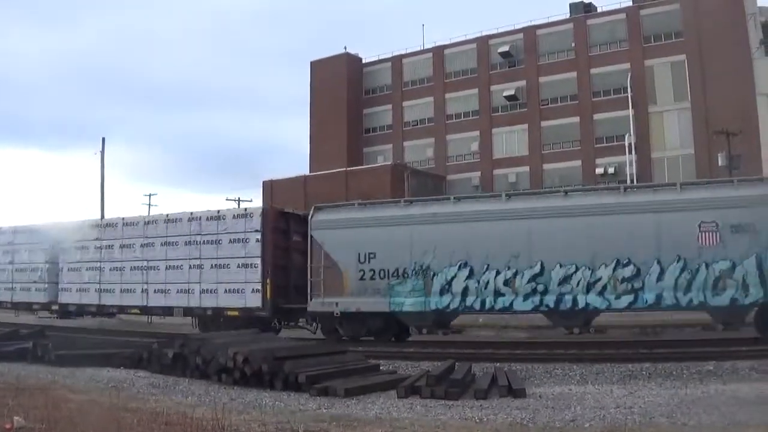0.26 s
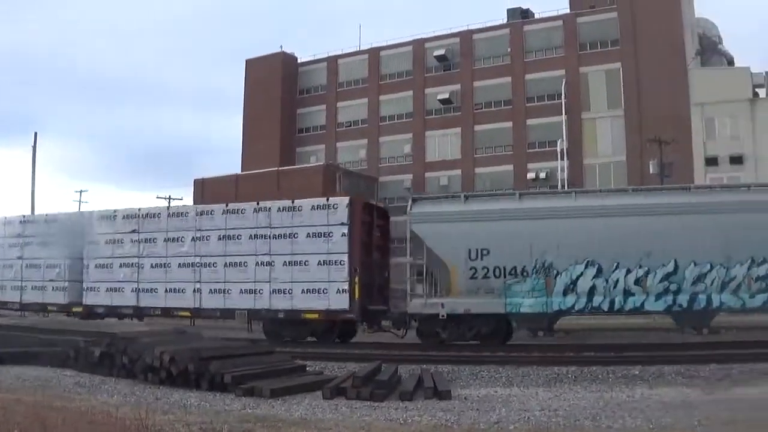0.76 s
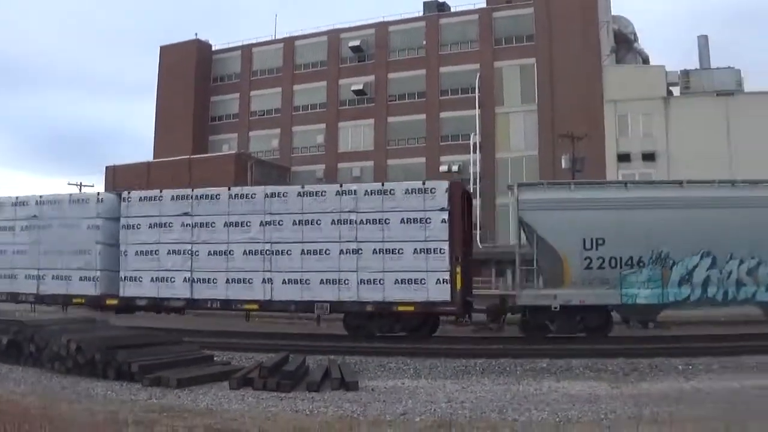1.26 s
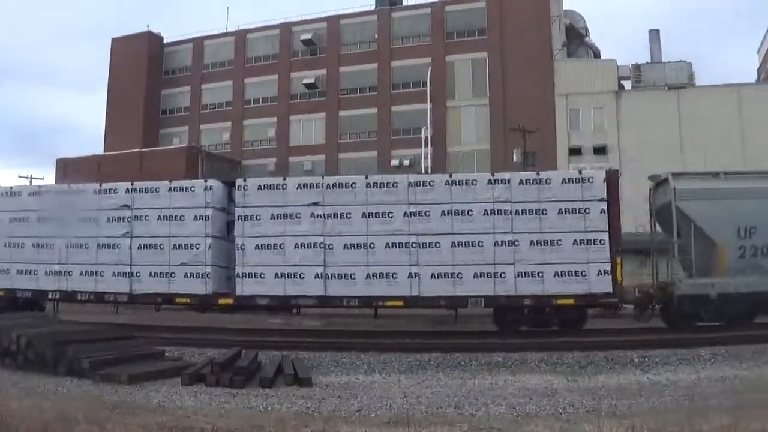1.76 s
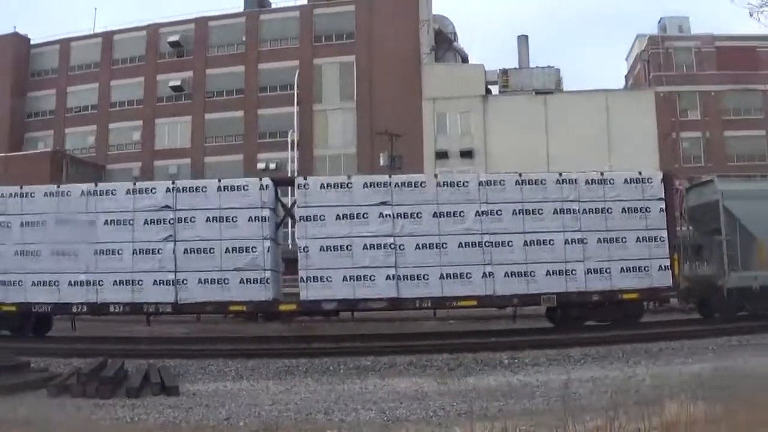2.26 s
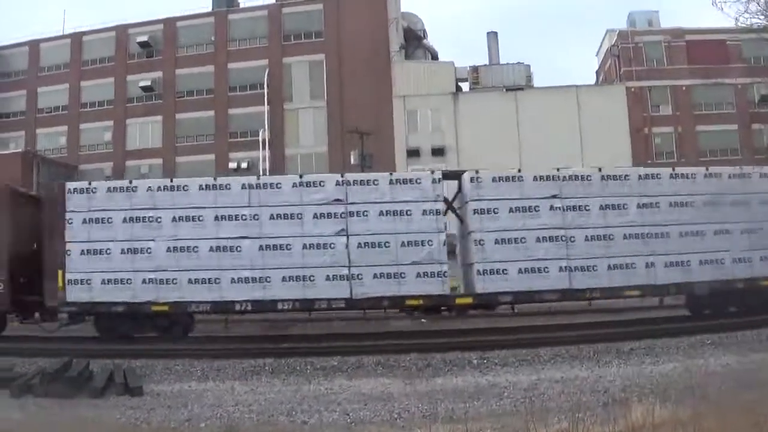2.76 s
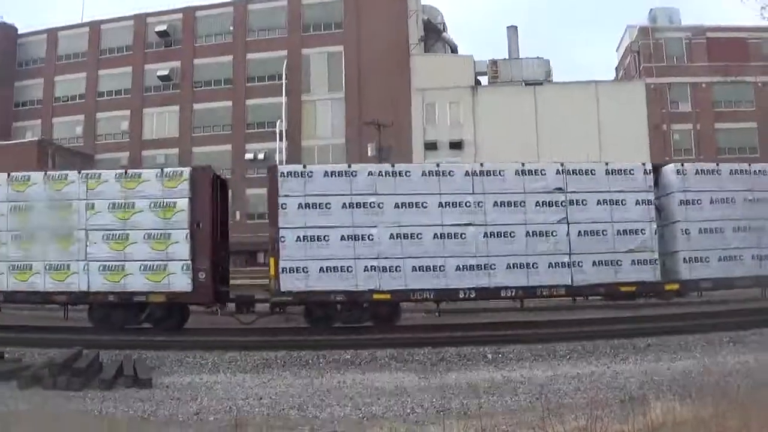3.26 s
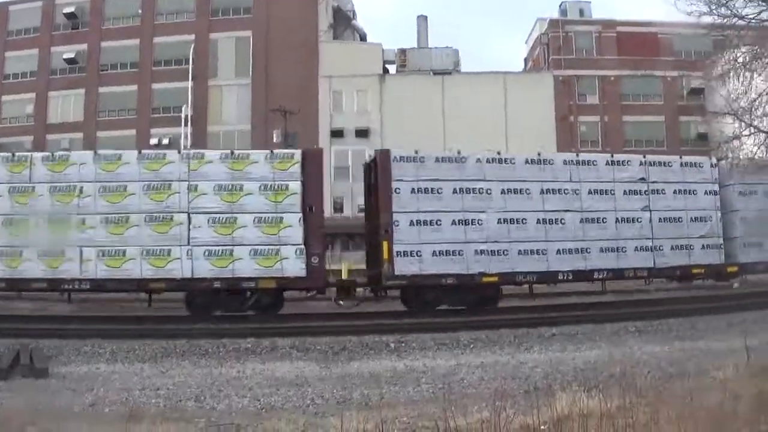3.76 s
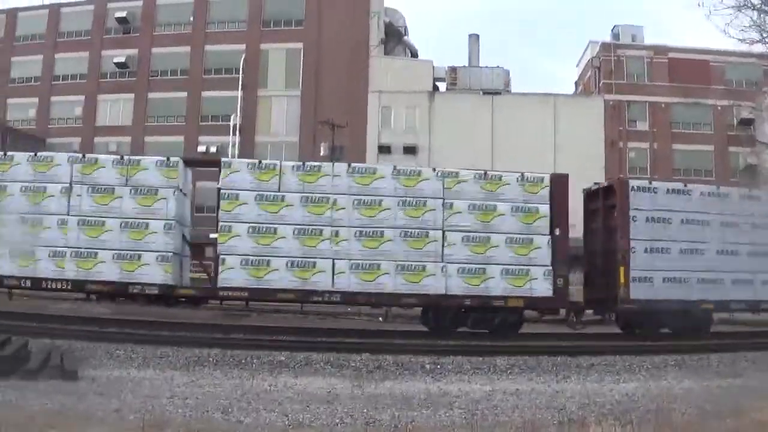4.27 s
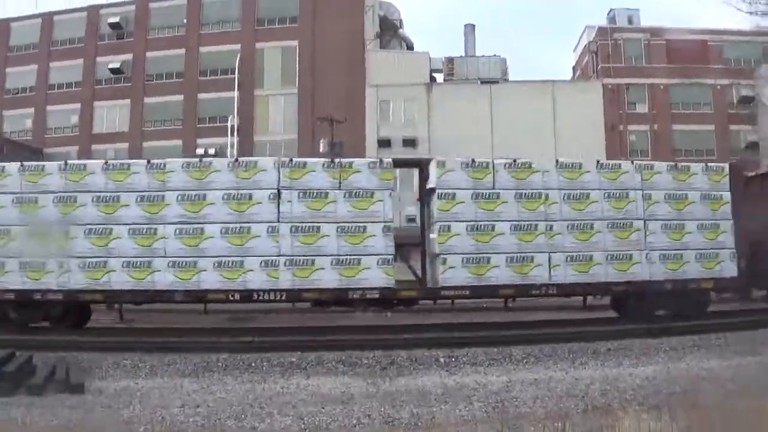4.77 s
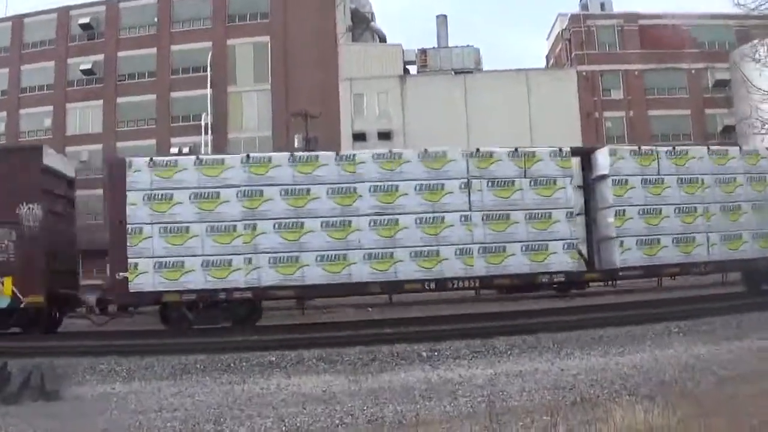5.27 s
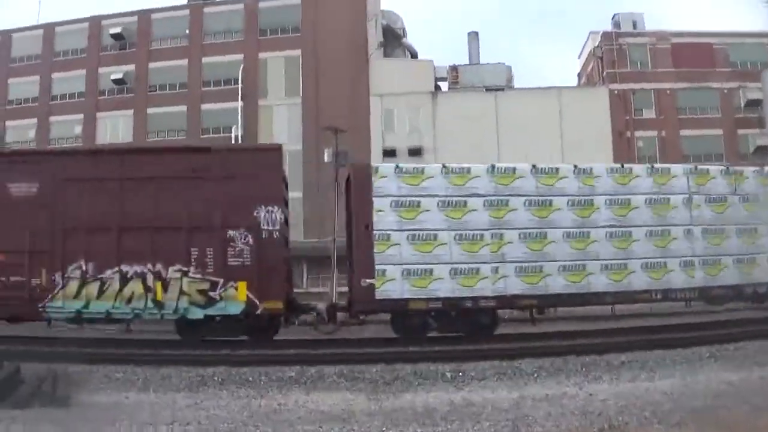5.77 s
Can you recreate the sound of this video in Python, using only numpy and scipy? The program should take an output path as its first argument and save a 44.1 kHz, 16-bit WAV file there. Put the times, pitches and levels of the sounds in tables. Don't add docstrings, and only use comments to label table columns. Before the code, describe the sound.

Steel wheels grind and ring against rails as heavy freight cars roll by in open air, heard trackside through a slightly compressed camera microphone. Thin squeals at many pitches flare and vanish, each sagging slightly. One long piercing howl dominates early, ducking the rumble and hiss; a quieter gap with thudding joints follows, then bursts of scraping and chirping squeals continue without stopping.

```python
import sys
import numpy as np
from scipy import signal
from scipy.fft import rfft, irfft
from scipy.io import wavfile
from scipy.ndimage import uniform_filter1d

SR = 44100
rng = np.random.default_rng(int(sys.argv[2]) if len(sys.argv) > 2 else 0)


def dump_mix(stems):
    frames = np.atleast_2d(stems).T
    limited = np.clip(frames, -1, 1)
    pcm = np.round(limited * 32767).astype(np.int16)
    wavfile.write(sys.argv[1], SR, pcm)


def ratio(d):
    e = np.asarray(d, float) / 20
    return 10 ** e


N = 264600


def curves(rows):
    s, *columns = np.transpose(rows)
    return [np.interp(np.arange(N) / SR, s, column) for column in columns]


def along(points, hz):
    f, value = np.transpose(points)
    return np.interp(np.log(hz + 1), np.log(f + 1), value)


def unit(x):
    return x / np.sqrt(np.mean(x ** 2) + 1e-20)


def wobble(rate, size=N):
    knots = rng.standard_normal(int(size * rate / SR) + 2)
    return 1.22 * np.interp(np.arange(size) * rate / SR, np.arange(len(knots)), knots)


def smooth(field, over_hz, over_time):
    return uniform_filter1d(uniform_filter1d(field, size=over_hz, axis=0), size=over_time, axis=1)


def rush(gain, size=1024):
    # (frequency [Hz], likeness [0-1])
    likeness = [(30, .9), (150, 0.54), (500, 0.68), (1500, 0.76), (4000, 0.73), (10000, 0.87)]
    # (frequency [Hz], left over right [dB])
    side_lean = [(100, 0), (500, -.5), (1500, -0.9), (4000, -0.8), (10000, 0.5)]
    overlap = size * 3 // 4
    hz, t, z = signal.stft(rng.standard_normal((2, N)), SR, nperseg=size, noverlap=overlap)
    hz = hz[:, None]
    turn = np.arccos(np.clip(along(likeness, hz), 0, 1)) / 2
    mid, side = z[0] * np.cos(turn), z[1] * np.sin(turn)
    lean = ratio(along(side_lean, hz) / 2)
    pair = np.array([(mid + side) * lean, (mid - side) / lean]) * gain(hz, t)
    return signal.istft(pair, SR, nperseg=size, noverlap=overlap)[1][:, :N]


def patches(hz, t, depth_db):
    return ratio(depth_db * unit(smooth(rng.standard_normal((len(hz), len(t))), 9, 9)))


def rolling():
    # (time [s], rumble level [dB], loose gear over rumble [dB])
    weight = [(0, -29.5, -5.5), (.3, -30.5, -5.5), (.68, -30.5, -8), (1.11, -34, -4.5), (1.22, -32, -10.5),
              (1.65, -33.5, -6), (2.41, -34.5, -5.5), (3.0, -31.5, -5.5), (3.3, -33.5, -5), (3.45, -32, -2),
              (3.7, -28.5, -6), (3.99, -39, -1.5), (4.54, -31, -9), (4.72, -38, -5.5), (4.95, -30, -3),
              (5.2, -28, -6), (5.55, -37.5, -6.5), (6, -35.5, -6.5)]
    # (time [s], extra car body [dB], extra loose gear [dB])
    jolt_rows = [(.1, 3, -1), (.47, 4.5, 0.5), (.79, 4.5, -3), (1.34, 4, 3), (3.13, 4.5, 1),
                 (3.91, 6.5, 0.5), (4.109, 6, 6.5), (4.37, 2, 6), (4.64, 2, 5.5), (4.83, 6, 5),
                 (5.1, 4.5, 1.5), (5.62, 5, 0.5), (5.84, 7, 1)]
    # (frequency [Hz], level per Hz [dB])
    rumble_spectrum = [(21, -45), (30, -11.5), (69, 3), (259, 1), (310, 0), (479, -19), (600, -15),
                       (780, -20.5), (1320, -120)]
    roar_spectrum = [(210, -27), (350, 0), (490, -7), (790, -1.5), (1340, -7), (1600, -3.5), (2080, -40),
                     (3520, -120)]
    jolt_s = 0.051

    weight_db, loose_db = curves(weight)
    s, body_db, gear_db = np.transpose(jolt_rows)
    jolt = np.clip(1 - np.abs(np.arange(N) / SR - s[:, None]) / (2 * jolt_s), 0, 1)
    rumble_db = weight_db + body_db @ jolt
    roar_db = weight_db + loose_db + gear_db @ jolt
    lumps = wobble(20)
    rumble = rush(lambda hz, t: ratio(along(rumble_spectrum, hz)) * patches(hz, t, 0.7))
    roar = rush(lambda hz, t: ratio(along(roar_spectrum, hz)) * patches(hz, t, 0.9))
    lumpy = unit(ratio(0.55 * lumps + 0.8 * wobble(45)) * rumble)
    rattling = unit(ratio(0.88 * lumps + 1.37 * wobble(70)) * roar)
    return ratio(rumble_db) * lumpy + ratio(roar_db + 1.5) * rattling


def knocks():
    # (time [s], peak level [dB], pitch [Hz])
    knock_rows = [(3.084, -27, 127), (3.091, -14, 170), (3.107, -16.5, 263), (3.118, -16.5, 224),
                  (3.14, -14.5, 150), (3.211, -21.5, 189), (4.088, -21.5, 143), (4.343, -23, 80.7),
                  (4.829, -21, 315), (5.074, -15, 290), (5.112, -12.5, 319)]
    out = np.zeros((2, N + SR))
    t = np.arange(SR // 10) / SR
    fade = ratio(-60 * t / 0.06) * (1 - np.exp(-t / 0.00095))
    for s, db, hz in knock_rows:
        lag = rng.normal(0, 0.35) * np.array([[1], [-1]])
        body = np.sin(2 * np.pi * hz * t + lag)
        overtone = 0.2 * np.sin(2 * np.pi * 2.3 * hz * t - lag)
        thud = (body + overtone) * fade
        out[:, round(s * SR):][:, :len(t)] += ratio(db - 2.5) * thud / np.abs(thud).max()
    return out[:, :N]


def faint_modes(hz, t, depth_db=3.0, shade_db=1.2):
    field = rng.standard_normal((2, len(hz), len(t)))
    streaks = smooth(field[0], 4, 10)
    shades = smooth(field[1], 30, 5)
    return ratio(depth_db * unit(streaks) + shade_db * unit(shades))


def wheel_modes(hz, t, width_hz=28, lift_db=-1.5):
    # (start [s], end [s], pitch sink [% per s])
    stretches = [
        (0, 1.74, 1.5),
        (1.7, 3.7, 1.35),
        (3.7, 4.44, 1.5),
        (4.44, 5.27, 1.2),
        (5.27, 6.03, 1.55),
    ]
    # (frequency at mid stretch [Hz], level over the grind [dB])
    near_modes = [(1523, 9), (1706, 9), (1868, 8), (1970, 11), (2363, 6), (2627, 6.5), (2966, 7.5),
                  (3305, 7.0), (4290, 9.5), (4780, 11.5), (5485, 5), (6169, 7.4), (8225, 8), (8833, 5)]
    leaving_modes = [(1480, 7.4), (1561, 5.6), (1620, 6.5), (1911, 6.6), (2304, 9), (2885, 8.8),
                     (3213, 7.9), (3547, 4.5), (4172, 9.9), (4651, 12), (4748, 10), (6045, 6.6), (6276, 11),
                     (8597, 6.8)]
    second_modes = [(7770, 7), (2271, 6.1), (2745, 9.1), (2982, 4.4), (3989, 5.9), (4495, 8.4), (4602, 6.7),
                    (4699, 5.5), (5458, 6.9), (6799, 7.4), (7353, 8), (8290, 7.5), (9259, 7.7),
                    (10206, 7.9)]
    third_modes = [(1868, 11), (1927, 6.6), (2718, 11.2), (3289, 7.3), (3531, 7.6), (4446, 11.4),
                   (4516, 9.2), (5900, 7), (6303, 8.0), (7251, 7.5), (7315, 7.8), (8188, 8.1), (8268, 8.6),
                   (9151, 9.9)]
    fourth_modes = [(1566, 9.6), (1808, 12.6), (1927, 7.0), (1997, 11), (2212, 11), (2691, 11.4),
                    (2761, 8.8), (3989, 10), (4053, 9.9), (4554, 11), (4721, 6), (5054, 5.6), (7940, 7.9),
                    (8182, 11.2)]
    sets = (near_modes, leaving_modes, second_modes, third_modes, fourth_modes)

    power = np.ones((len(hz), len(t)))
    for (start, end, sink), modes in zip(stretches, sets):
        near = np.clip(np.minimum(t - start, end - t) / 0.05 + 0.5, 0, 1)
        now = near > 0
        doppler = 1 - sink / 100 * (t[now] - (start + end) / 2)
        for mode_hz, db in modes:
            wax_db = 1.1 * unit(uniform_filter1d(rng.standard_normal(now.sum()), size=3))
            width = width_hz * np.sqrt(mode_hz / 4000)
            peak = 1 / (1 + (2 * (hz - mode_hz * doppler) / width) ** 2)
            power[:, now] += near[now] * ratio(db + lift_db + wax_db) ** 2 * peak
    return power


def bites():
    # (time [s], extra hiss [dB], length [s])
    bite_rows = [
        (.07, 1.5, 0.12),
        (2.685, 3, 0.099),
        (3.703, 7.5, 0.15),
        (3.932, 10.5, 0.5),
        (4.45, 3, .1),
        (4.836, 0.5, 0.25),
        (5.626, 2.5, 0.38),
    ]
    attack_s = 0.009
    t = np.arange(N) / SR
    total = np.zeros(N)
    for s, db, length in bite_rows:
        rise = np.clip((t - s) / attack_s, 0, 1)
        release = np.clip(1 - ((t - s) / length) ** 2, 0, 1)
        total += db * rise * release
    return total


def flanges():
    # (time [s], pressure [dB], slip as hiss over grind [dB])
    contact = [(0, -26, 1), (.2, -31, 3), (.4, -29.5, 5), (.56, -25.5, 9), (.86, -24.5, 0.5),
               (1.17, -24.5, 6), (1.44, -26, 11.5), (1.64, -27.5, 11.5), (2.02, -26.5, 6.5),
               (2.51, -28.5, 4), (2.84, -31, -0.5), (3.16, -31.5, -4), (3.68, -29.5, -7.5),
               (3.91, -31, -9.5), (4.42, -28.5, -1.5), (4.8, -25, -0.5), (5.18, -29.5, -6.5),
               (5.32, -25.5, 2.5), (6, -25.5, 4)]
    # (frequency [Hz], level per Hz [dB])
    grind_spectrum = [(790, -24.5), (1350, -20), (1670, -3), (2110, -6), (2390, -3.5), (3940, -5),
                      (4610, -5), (5040, -5.5), (6970, -5.5), (8380, 0.5), (11000, -6), (14300, -43),
                      (22000, -120)]

    pressure_db, slip_db = curves(contact)
    bite_db = bites()
    grind_db = pressure_db - slip_db / 2 + 0.11 * bite_db
    scrape_db = pressure_db - 0.63 + 0.18 * slip_db + 0.59 * bite_db
    hiss_db = pressure_db + slip_db / 2 + bite_db

    def contact_gain(hz, t):
        return ratio(along(grind_spectrum, hz)) * np.sqrt(wheel_modes(hz, t)) * faint_modes(hz, t)

    noise = rush(contact_gain, size=4096)
    hz = np.fft.rfftfreq(N, 1 / SR)
    spectrum = rfft(noise)
    grind = irfft(spectrum / (1 + (hz / 4100) ** 8), N)
    hiss = irfft(spectrum / (1 + (7300 / (hz + 1)) ** 12), N)
    scrape = noise - grind - hiss
    low = ratio(grind_db + 0.98) * unit(grind)
    middle = ratio(scrape_db + 1.96) * unit(scrape)
    high = ratio(hiss_db + 1.1) * unit(hiss)
    return low + middle + high


def tone(hz, wander, flutter_db):
    size = len(hz)
    unsteady_hz = hz * (1 + wander * wobble(51.2, size=size))
    phase = 2 * np.pi * np.cumsum(unsteady_hz) / SR + 2 * np.pi * rng.random()
    shift = rng.normal(0, 0.24) + 0.15 * wobble(9.8, size=size)
    flutter = flutter_db * (0.5 * wobble(28.9, size=size) + wobble(113.9, size=size))
    lean_db = rng.normal(0, 0.23) * np.array([[1], [-1]])
    return np.sqrt(2) * ratio(flutter + lean_db) * np.sin([phase, phase + shift])


def squeals(sink=1.4, lift_db=1.1, wander=0.00092, flutter_db=2.5):
    # (start [s], peak [s], end [s], pitch [Hz], peak rms level [dB])
    squeal_rows = [(0.0, 0.01, 0.04, 1851, -30), (0.0, 0.03, 0.12, 8090, -26),
                   (0.035, 0.06, 0.13, 4533, -29.5), (0.07, 0.2, 0.31, 4838, -34),
                   (0.052, 0.25, 0.4, 6217, -27.5), (0.26, 0.33, 0.38, 8871, -30),
                   (0.34, 0.413, 0.45, 4818, -21), (0.24, 0.42, 0.47, 4620, -34),
                   (0.49, 0.57, 0.61, 7881, -29), (0.45, 0.57, 0.61, 8176, -27),
                   (0.57, 0.64, 0.71, 8940, -30), (0.47, 0.66, 0.78, 4808, -24.5),
                   (0.59, 0.67, 0.86, 8253, -25), (0.65, 0.69, 0.81, 8785, -27),
                   (0.6, 0.73, 0.77, 6332, -25.5), (0.49, 0.53, 0.56, 8225, -27),
                   (0.67, 0.77, 0.81, 8177, -28.5), (0.75, 0.82, 0.88, 7830, -29),
                   (0.79, 0.836, 0.93, 4732, -25), (0.83, 0.87, 0.98, 2005, -26.5),
                   (0.83, 0.89, 0.93, 8847, -30), (0.87, 0.94, 1.05, 6212, -27.5),
                   (0.94, 0.95, 1.12, 4781, -29), (0.94, 1.02, 1.1, 8480, -28),
                   (0.92, 0.98, 1.06, 8742, -27), (1.05, 1.11, 1.18, 8699, -28),
                   (0.93, 0.95, 1.1, 6302, -28.5), (1.0, 1.03, 1.09, 8217, -27),
                   (1.01, 1.06, 1.11, 4271, -27), (0.93, 1.064, 1.28, 1950, -32),
                   (0.96, 1.11, 1.26, 3604, -29), (0.96, 1.12, 1.17, 9699, -27.5),
                   (1.1, 1.17, 1.28, 10748, -32), (1.09, 1.17, 1.24, 7751, -29),
                   (1.12, 1.19, 1.23, 4271, -29), (1.13, 1.185, 1.3, 8185, -22.5),
                   (1.28, 1.305, 1.4, 4745, -21), (1.11, 1.32, 1.41, 2350, -31),
                   (1.29, 1.34, 1.56, 4253, -25.5), (0.53, 0.63, 0.68, 9776, -30),
                   (1.17, 1.381, 1.48, 8167, -21.5), (1.37, 1.44, 1.6, 4450, -25.5),
                      (1.36, 1.44, 1.57, 8749, -27), (1.367, 1.46, 1.49, 6368, -31),
                      (1.4, 1.47, 1.5, 8581, -29), (1.479, 1.51, 1.61, 7737, -24.5),
                      (1.48, 1.54, 1.57, 9731, -27), (1.5, 1.57, 1.65, 8145, -31),
                      (1.43, 1.58, 1.62, 6170, -29), (1.52, 1.6, 1.65, 7823, -34),
                      (1.57, 1.68, 1.75, 6369, -33), (1.57, 1.65, 1.8, 9985, -27.5),
                      (1.69, 1.76, 1.94, 9447, -34), (1.779, 1.88, 2.09, 4218, -27),
                      (1.89, 1.96, 2.14, 5410, -28), (1.8, 1.96, 2.09, 4810, -28),
                      (1.85, 1.91, 2.1, 9930, -30), (1.99, 2.04, 2.08, 8081, -24),
                      (1.99, 2.04, 2.25, 7896, -30), (1.95, 2.07, 2.11, 9637, -24.5),
                      (2.05, 2.12, 2.32, 4680, -25.5), (2.111, 2.13, 2.27, 4216, -29),
                      (1.96, 2.14, 2.22, 8658, -25.5), (2.05, 2.152, 2.35, 7717, -33),
                      (2.009, 2.158, 2.25, 2340, -29.5), (2.14, 2.18, 2.28, 9620, -25),
                      (2.089, 2.19, 2.3, 9367, -32), (2.09, 2.203, 2.24, 5650, -32.5),
                      (2.11, 2.208, 2.34, 4820, -25), (2.23, 2.28, 2.32, 6310, -24.5),
                      (2.29, 2.34, 2.42, 7626, -30), (2.36, 2.367, 2.5, 4780, -30),
                      (2.36, 2.48, 2.52, 9588, -32), (2.54, 2.65, 2.83, 2802, -31.5),
                      (2.59, 2.65, 2.81, 4648, -33), (2.7, 2.74, 2.8, 8576, -30),
                      (2.83, 3.018, 3.09, 4643, -32.5), (2.94, 3.15, 3.23, 4530, -33.5),
                      (3.25, 3.28, 3.34, 4688, -31),
                   (3.28, 3.32, 3.5, 4626, -34), (3.24, 3.44, 3.51, 2851, -36.5),
                (3.52, 3.73, 3.78, 4624, -33.5), (3.71, 3.75, 3.79, 9259, -28),
                (3.73, 3.79, 3.83, 7374, -26.5), (3.66, 3.87, 3.99, 2272, -32),
                (3.92, 3.96, 4.09, 2727, -32), (3.94, 3.97, 4.09, 10110, -26),
                (3.95, 3.99, 4.06, 10215, -28), (3.95, 4.01, 4.07, 9262, -28),
                (3.94, 4.03, 4.11, 8360, -25), (4.01, 4.04, 4.08, 7755, -28), (4.05, 4.09, 4.12, 8306, -31),
                (4.08, 4.11, 4.26, 1902, -29.5), (4.09, 4.13, 4.2, 7765, -27),
                (4.05, 4.13, 4.25, 6791, -30), (4.16, 4.19, 4.24, 10172, -23),
                (4.09, 4.21, 4.25, 7676, -29), (4.14, 4.21, 4.24, 8300, -23),
                (4.08, 4.22, 4.31, 4491, -31.5), (4.17, 4.23, 4.43, 7845, -32),
                (4.19, 4.26, 4.34, 6536, -30), (4.19, 4.27, 4.32, 7763, -25),
                (4.26, 4.285, 4.34, 8360, -29), (4.29, 4.33, 4.38, 7666, -25),
                (4.34, 4.37, 4.5, 1893, -28.5), (4.35, 4.48, 4.54, 4526, -31),
                (4.43, 4.49, 4.52, 2753, -27.5), (4.46, 4.5, 4.66, 6330, -24), (4.46, 4.54, 4.6, 7215, -30),
                (4.56, 4.67, 4.72, 4480, -24), (4.67, 4.73, 4.78, 3535, -29.5),
                (4.52, 4.73, 4.79, 1887, -27.5), (4.74, 4.76, 4.82, 4517, -30),
                (4.74, 4.78, 4.99, 4443, -31), (4.8, 4.83, 5.04, 7239, -34),
                (4.84, 4.88, 4.91, 8182, -22.5), (4.71, 4.92, 4.96, 9127, -28.5),
                (4.93, 4.97, 5.03, 8185, -30),
                   (5.11, 5.23, 5.32, 8158, -34), (5.21, 5.26, 5.32, 6278, -32), (5.23, 5.27, 5.33, 4454, -29),
                (5.28, 5.31, 5.45, 9351, -27), (5.27, 5.32, 5.43, 2766, -32.5),
                (5.29, 5.32, 5.37, 1949, -24), (5.26, 5.34, 5.43, 4570, -29.5),
                (5.31, 5.35, 5.43, 1588, -30), (5.3, 5.35, 5.41, 7407, -29), (5.35, 5.39, 5.59, 1988, -26),
                (5.33, 5.39, 5.5, 8390, -28.5), (5.47, 5.5, 5.53, 8278, -27), (5.38, 5.59, 5.63, 8170, -25),
                (5.42, 5.53, 5.61, 2217, -35), (5.46, 5.56, 5.61, 6180, -31), (5.37, 5.58, 5.66, 1804, -26),
                (5.39, 5.6, 5.7, 4720, -36), (5.45, 5.5, 5.63, 4040, -28.5), (5.45, 5.66, 5.74, 4570, -32),
                (5.64, 5.66, 5.74, 4052, -35), (5.63, 5.68, 5.74, 7859, -29),
                (5.65, 5.68, 5.73, 8182, -20.5), (5.64, 5.68, 5.74, 5215, -31),
                (5.64, 5.68, 5.87, 9654, -29), (5.68, 5.7, 5.83, 9010, -32), (5.61, 5.71, 5.86, 5048, -28),
                (5.57, 5.73, 5.79, 7925, -23), (5.54, 5.75, 5.81, 2693, -29.5),
                (5.67, 5.75, 5.88, 3993, -24), (5.61, 5.77, 5.84, 2006, -30),
                (5.76, 5.79, 5.92, 8120, -22.5), (5.76, 5.8, 5.86, 4044, -33),
                (5.81, 5.84, 5.97, 7869, -32), (5.78, 5.86, 6.0, 1794, -32), (5.82, 5.9, 5.93, 9912, -26),
                (5.87, 5.92, 6.0, 6004, -31), (5.76, 5.94, 6.0, 4525, -26.5), (5.9, 5.95, 6.0, 2754, -27),
                (5.84, 5.96, 6.0, 3352, -26.5), (5.94, 5.98, 6.0, 8122, -27),
                   (.02, 0.046, .09, 1960, -30), (.69, 0.756, .84, 2024, -32),
                      (1.21, 1.26, 1.3, 2971, -33), (1.91, 1.936, 1.98, 2341, -30.5),
                      (1.57, 1.65, 1.69, 6075, -30), (2.5, 2.54, 2.58, 6330, -29),
                      (2.17, 2.242, 2.3, 3569, -33), (2.36, 2.41, 2.46, 3558, -34),
                      (3.52, 3.566, 3.72, 2277, -33), (3.71, 3.725, 3.75, 8370, -27),
                      (3.79, 3.82, 3.9, 2285, -32), (3.94, 3.96, 4.0, 5550, -33),
                      (4.09, 4.14, 4.18, 2960, -31.5), (4.1, 4.13, 4.26, 6346, -33),
                      (4.68, 4.71, 4.75, 5318, -32), (4.95, 4.98, 5.01, 2660, -29)]
    edge_s = 0.025
    end_db, shape = 7.5, 0.64

    out = np.zeros((2, N + 2 * SR))
    for start, peak, end, hz, db in squeal_rows:
        at = round((start - edge_s) * SR)
        t = np.arange(at, round((end + edge_s) * SR)) / SR
        before = (peak - t) / max(peak - start, edge_s / 2)
        after = (t - peak) / max(end - peak, edge_s / 2)
        away = np.clip(np.maximum(before, after), 0, 1)
        to_edge = np.minimum(t - t[0], t[-1] - t)
        gate = np.sin(np.pi / 2 * np.clip(to_edge / (2 * edge_s), 0, 1))
        swell = gate * ratio(db + lift_db - end_db * away ** shape)
        sinking_hz = hz * (1 - sink / 100 * (t - peak))
        out[:, SR + at:][:, :len(t)] += swell * tone(sinking_hz, wander, flutter_db)
    return out[:, SR:SR + N]


def howl(rows):
    hz, db = curves(rows)
    t = np.arange(N) / SR
    gate = np.clip(np.minimum(t - rows[0][0] + 0.02, rows[-1][0] - t) / 0.03, 0, 1)
    on = gate > 0
    out = np.zeros((2, N))
    out[:, on] = (gate * ratio(db))[on] * tone(hz[on], wander=0.0007, flutter_db=1.3)
    return out


def howls():
    # (time [s], pitch [Hz], rms level [dB])
    high_howl = [
        (0.0, 8005, -22),
        (.075, 7990, -23),
        (.094, 7990, -30),
        (.11, 7988, -20),
        (.204, 7975, -16.5),
        (.275, 7962, -27),
        (.305, 7953, -20),
        (.53, 7935, -33),
    ]
    loud_howl = [
        (1.44, 4728, -32),
        (1.47, 4724, -26),
        (1.55, 4732, -24),
        (1.65, 4728, -21),
        (1.7, 4725, -15),
        (1.83, 4720, -13),
        (1.9, 4726, -17.5),
        (2.03, 4694, -26),
        (2.1, 4670, -31),
    ]
    return howl(high_howl) + howl(loud_howl)


def sides(pan_db):
    return ratio(np.array([pan_db, -pan_db]) / 2)


def turned_down(tones):
    knee_db, squeeze, react_s = -21.5, 0.86, 0.054
    power = np.abs(uniform_filter1d(np.mean(tones ** 2, axis=0), round(react_s * SR)))
    level_db = 10 * np.log10(power + 1e-12)
    return ratio(-squeeze * np.maximum(level_db - knee_db, 0))


def scene():
    # (time [s], left over right [dB])
    wheel_place = [(0.0, -1.6), (0.23, -3.4), (0.53, 0.0), (0.76, 0.3), (1.87, -2.6), (2.72, -1.4),
                   (3.02, -3.6), (3.64, 0.1), (3.86, 0.0), (4.42, -3.2), (4.6, -2.5), (5.1, -3.1),
                   (5.24, -0.7), (5.43, 1.0), (6.0, -0.8)]
    grinding = flanges()
    tones = squeals() + howls()
    duck = turned_down(tones)
    wheels = (duck * grinding + tones) * sides(curves(wheel_place)[0])
    return wheels + duck * rolling() + knocks()


def band_limit(x):
    return signal.sosfilt(signal.butter(12, 11570, fs=SR, output="sos"), x)


def record(dry):
    ceiling, top_hz = 0.8, 11035
    soft = dry / (1 + (dry / ceiling) ** 4) ** 0.25
    limited = irfft(rfft(soft) * (np.fft.rfftfreq(N, 1 / SR) < top_hz), N)
    return band_limit(limited)


dry = scene()
out = record(dry)
dump_mix(out)
```